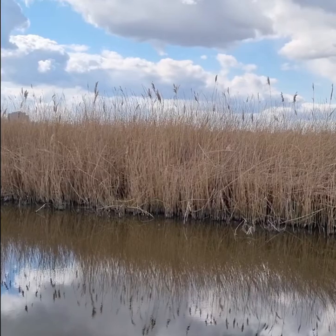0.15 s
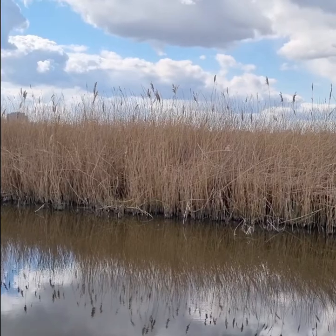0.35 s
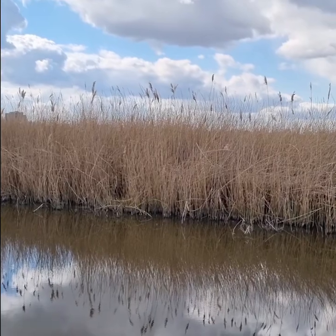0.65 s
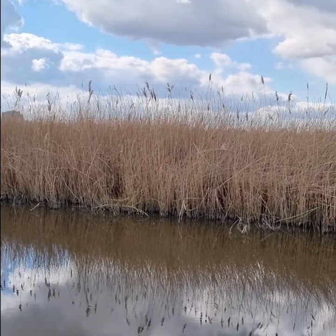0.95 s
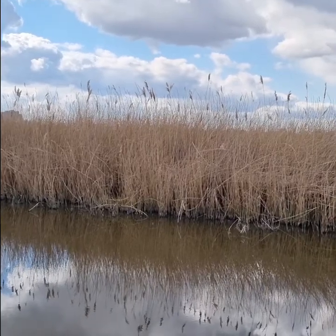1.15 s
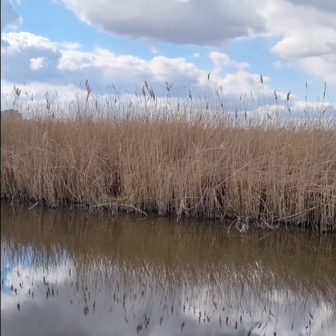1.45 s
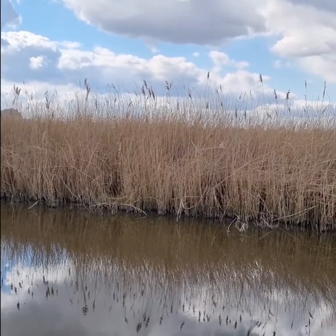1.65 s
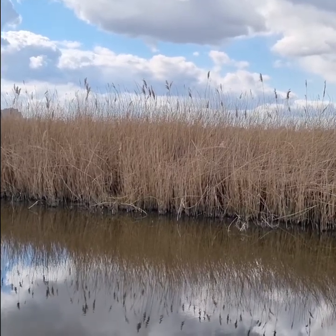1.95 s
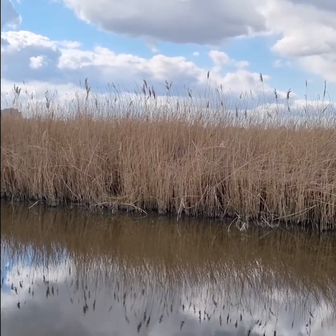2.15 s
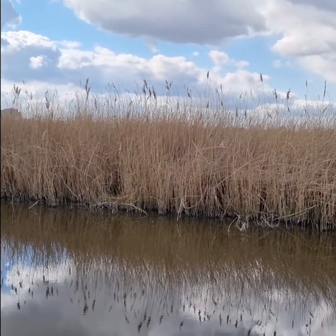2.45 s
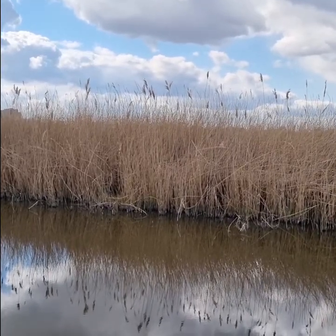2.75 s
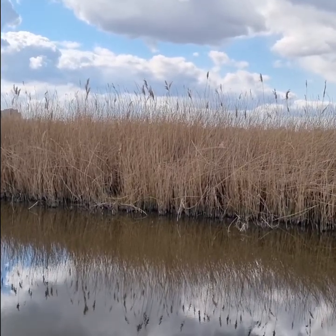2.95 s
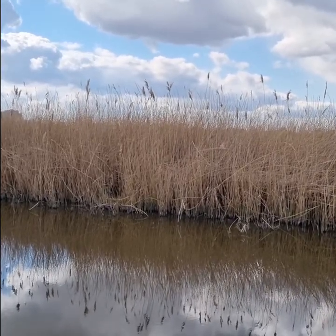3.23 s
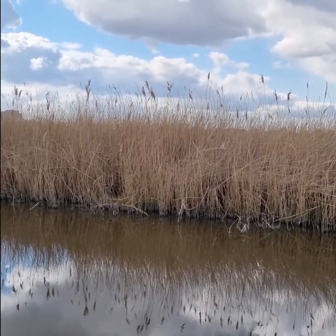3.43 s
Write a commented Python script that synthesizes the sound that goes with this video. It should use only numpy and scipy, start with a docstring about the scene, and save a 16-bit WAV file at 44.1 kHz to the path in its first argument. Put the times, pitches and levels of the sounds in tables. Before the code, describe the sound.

A songbird in a waterside reed bed, slightly to the right, repeats slurred notes before breaking into quick chips, ticking chatter and swelling rasps. Wind rumbles low throughout, with faint far traffic and thin whistles from other birds.

```python
"""A reed bed across a ditch, a little to the right, where a reed warbler sings: five sweeping notes with
upward slurs, four hoarse arches, pairs of falling chips, tick-and-zip chatter and two swelling rasps.
Vibrating membranes in its syrinx are the source, throat and beak the filter; the stems scatter the song.
Fainter birds whistle behind it, over low wind rumble, a far road on the left, a faint passing hum
and a brief rustle of dry reeds."""
import sys
import numpy as np
from scipy import signal
from scipy.fft import rfft, irfft
from scipy.io import wavfile
from scipy.ndimage import map_coordinates

SR = 44100
rng = np.random.default_rng(int(sys.argv[2]) if len(sys.argv) > 2 else 0)


def generate_wav(signal):
    """Clip the signal to [-1, 1] and save it as 16-bit WAV at the path in sys.argv[1]."""
    frames = np.transpose(np.atleast_2d(signal))
    scaled = np.clip(frames, -1, 1) * 32767
    pcm = np.round(scaled).astype(np.int16)
    wavfile.write(sys.argv[1], SR, pcm)


N = 158319
EDGE_S = 0.0013


def undb(db):
    return 10 ** (np.asarray(db) / 20)


def unit(x):
    return x / np.sqrt(np.mean(x ** 2))


def clock(length_s):
    return np.arange(int(length_s * SR)) / SR


def curve(at, table):
    """Linear interpolation of every column of a table along the first."""
    rows = np.array(table, float).T
    return [np.interp(at, rows[0], col) for col in rows[1:]]


def db_at(hz, spectrum):
    """Interpolation of a spectrum on a log-frequency axis."""
    f, db = np.array(spectrum, float).T
    return np.interp(np.log(np.maximum(hz, 1)), np.log(f), db)


def colour(x, spectrum, share=1):
    """Linear filtering: each frequency gains a share of the spectrum's decibels."""
    hz = np.fft.rfftfreq(len(x), 1 / SR)
    return irfft(rfft(x) * undb(share * db_at(hz, spectrum)), len(x))


def noise(spectrum, size):
    """Filtered Gaussian noise of unit power."""
    return unit(colour(rng.standard_normal(size), spectrum))


def walk(rate_hz, size):
    """Smooth random modulation with a spread near 1."""
    at = np.arange(size) * rate_hz / SR
    return map_coordinates(rng.standard_normal(512), [at], order=3, mode="mirror")


def add(out, start_s, note):
    """Superposition: a note joins the mix with ramped edges."""
    t = np.arange(len(note)) / SR
    note = note * np.clip(np.minimum(t, t[-1] - t) / EDGE_S, 0, 1)
    i = int(start_s * SR)
    out[i:i + len(note)] += note[:N - i]


# Wind spectrum: frequency_hz, density_db
WIND_SPECTRUM = [(15, -23), (30, -17.5), (42, -16.5), (52, 1.5), (65, -0.5), (80, -2.5), (105, -6.5),
                 (140, -16), (200, -17.5), (280, -26), (420, -32.5), (700, -44.5), (2000, -79)]
def wind():
    """Correlated noise: a low rumble, nearly the same on both sides, gently unsteady."""
    mid, side = noise(WIND_SPECTRUM, N), noise(WIND_SPECTRUM, N)
    swell = undb(-45.5 + walk(3.8, N))
    return swell * (mid + undb(-15) * side * np.array([[1], [-1]]))


# Tyre spectrum: frequency_hz, density_db
TYRE_SPECTRUM = [(100, -16.5), (300, -12), (500, -15), (640, -9), (790, 1), (950, 1.5), (1180, -1),
                 (1550, -13), (2300, -24), (3600, -29.5), (4700, -36), (6000, -43), (7500, -56),
                 (10000, -60), (14000, -50.5)]
# Leftward bias, of which each ear takes a share: frequency_hz, bias_db
ROAD_BIAS = [(200, 6.5), (500, 12), (1300, 6.5), (2400, 6), (3500, -1)]
def road():
    """Interaural level difference places a steady tyre roar far off to the left."""
    shared = noise(TYRE_SPECTRUM, N)
    swell = undb(-51 + 1.1 * walk(3.576, N))
    left, right = [unit(np.roll(shared, lag) + undb(-1) * noise(TYRE_SPECTRUM, N)) for lag in (0, 2)]
    return swell * np.array([colour(left, ROAD_BIAS, 0.51), colour(right, ROAD_BIAS, -0.39)])


def syrinx(hz, partials, rough):
    """A vibrating membrane gives partials (multiple, level_db); roughness modulates size and phase."""
    size, rough_hz, jitter = len(hz), 697, 0.0066
    phase = 2 * np.pi * np.cumsum(hz * (1 + jitter * walk(300, size))) / SR
    shake = 1 + rough * (walk(2 * rough_hz, size) + 1j * walk(2 * rough_hz, size))
    tone = sum(undb(db) * np.exp(1j * k * phase) for k, db in partials)
    return np.sqrt(2 / (1 + 2 * rough ** 2)) * np.imag(shake * tone)


# Glide of a sweep's fundamental: time_s, pitch_hz
SWEEP_GLIDE = [(0, 1420), (.011, 1650), (.02, 1780), (.028, 1823), (.04, 1707), (.06, 1670), (.082, 1540),
               (.105, 1460), (.135, 1440)]
# Envelopes of its harmonics: time_s, second_db, third_db, fourth_db
SWEEP_ENVELOPES = [(0, -27, -27, -28), (.011, -4, -3, -17.5), (.026, 0.5, -11.5, -37.5),
                   (.04, -7, -11, -40.5), (.06, -8.5, -18.5, -53.5), (.08, -26.5, -13, -59.5),
                   (.1, -25, -32, -58), (.145, -30, -48, -67)]
# Noise of its attack: frequency_hz, density_db
ATTACK_SPECTRUM = [(2800, -22.5), (4200, -13), (4800, 2.5), (6600, -6.5), (7400, -20.5), (9000, -52)]
# Sweeping notes: start_s, pitch_ratio, level_db, brightness_db
SWEEP_NOTES = [(0.146, 0.96, -51, 1.5), (.372, 1.005, -48.5, -2.5), (0.609, 1, -49, 0.5),
               (0.861, 1, -46.5, -1), (1.121, 1.004, -46.5, -2)]
def sweeps():
    """Frequency modulation: harmonics 2 to 4 leap up with a rough attack and sink slowly."""
    out, t = np.zeros(N), clock(SWEEP_ENVELOPES[-1][0])
    hz, = curve(t, SWEEP_GLIDE)
    second, third, fourth = curve(t, SWEEP_ENVELOPES)
    rough = 0.065 + 0.4 * np.exp(-t / 0.0077)
    peak_s = 0.016
    burst = undb(-16.5) * t / peak_s * np.exp(1 - t / peak_s)
    for start, ratio, db, brightness_db in SWEEP_NOTES:
        flutter_db = 2.2 * walk(150, len(t))
        low = syrinx(ratio * hz, [(2, second + flutter_db)], rough)
        upper = syrinx(ratio * hz, [(3, third - flutter_db), (4, fourth)], .5 * np.exp(-t / 0.053))
        attack = burst * noise(ATTACK_SPECTRUM, len(t))
        add(out, start, undb(db) * (low + undb(brightness_db) * (upper + attack)))
    return out


def reed_bed(song):
    """Multiple scattering: near stems add quick echoes to the direct sound, the whole bed a tail."""
    t, ears = clock(.5), []
    near_decay_s, tail_t60_s = 0.016, 0.25
    for side, lag_s in ((0.35, 0), (-1.14, .00005)):  # left ear, then the louder right
        near, far = rng.standard_normal((2, len(t)))
        near = undb(-7.5) * unit(near * np.exp(-t / near_decay_s))
        far = undb(-10.5) * unit(far * undb(-60 * t / tail_t60_s))
        scattered = signal.fftconvolve(song, (near + far) / np.sqrt(len(t)))[:N]
        direct = np.roll(song, round(lag_s * SR))
        ears.append(undb(-7.5 * side / 2) * direct + undb(-8.5 * side / 2) * scattered)
    return np.array(ears)


# Contour of a slur: length_fraction, nominal_pitch_hz, level_db
SLUR_CONTOUR = [(0, 2996, -17.5), (.3, 3214, -3.5), (.52, 3545, -1.5), (.75, 3905, -4), (1, 3630, -7)]
# Slurs between the sweeps: start_s, length_s, pitch_ratio, level_db, roughness
SLUR_NOTES = [(0.287, 0.041, 1, -58.5, 0.33), (0.507, 0.051, 1, -54.5, .3), (0.761, .045, 1, -54, .36),
              (1.02, 0.042, 0.99, -54.5, 0.31)]
def slurs():
    """Glissando: one hoarse partial leads back up to the next sweep."""
    out = np.zeros(N)
    for start, length, ratio, db, rough in SLUR_NOTES:
        hz, shape_db = curve(clock(length) / length, SLUR_CONTOUR)
        add(out, start, syrinx(ratio * hz, [(0.98, db + shape_db)], rough))
    return out


# Band of the hum: pitch_ratio, density_db
HUM_SPECTRUM = [(.65, -42), (.92, -9), (1.001, 0.5), (1.06, -3), (1.169, -24.5), (1.7, -58.5)]
def far_hum(start_s=1.1, length_s=0.45, pitch_hz=402, level_db=-68.5):
    """Narrow-band noise is heard as a pitch: a faint hum swells and fades in the distance."""
    out, progress = np.zeros(N), clock(length_s) / length_s
    hum = noise([(ratio * pitch_hz, db) for ratio, db in HUM_SPECTRUM], len(progress))
    add(out, start_s, undb(level_db) * np.sqrt(2 * np.sin(np.pi * progress)) * hum)
    return out


# Contour of an arch: length_fraction, pitch_hz, level_db
ARCH_CONTOUR = [(0, 1200, -9), (.3, 1428, -7), (.5, 1500, -2), (.75, 1480, -5), (1, 1296, -9)]
# Arched notes: start_s, length_s, pitch_ratio, level_db, third_db, fourth_db, roughness
ARCH_NOTES = [(1.319, 0.039, .985, -56, 0.5, 4.5, .3), (1.37, 0.048, 1.03, -51, -9.5, -36, 0.53),
              (1.428, .044, 1.08, -48.5, -24, -40, 0.53), (1.493, 0.028, 1.13, -48.5, -26.5, -35, 0.03)]
def arches():
    """Brightness grows with amplitude: hoarse notes rise and bend, the first flashing at its top."""
    out = np.zeros(N)
    for start, length, ratio, db, third_db, fourth_db, rough in ARCH_NOTES:
        hz, shape_db = curve(clock(length) / length, ARCH_CONTOUR)
        partials = [(2, 0), (3, third_db), (4, fourth_db + 1.4 * (shape_db + 1.5))]
        add(out, start, undb(db + shape_db) * syrinx(ratio * hz, partials, rough))
    return out


# Envelope of the rustle: time_s, level_db
RUSTLE_ENVELOPE = [(1.58, -105), (1.67, -82), (1.72, -82), (1.82, -87), (1.86, -77.5), (1.95, -105)]
# Spectrum of rubbing reeds: frequency_hz, density_db
RUSTLE_SPECTRUM = [(2000, -6.5), (5000, 0), (7000, 9), (9000, -12.5), (13000, -1.5), (15500, -5)]
def rustle():
    """Friction noise: dry reeds brush each other for a moment."""
    db, = curve(np.arange(N) / SR, RUSTLE_ENVELOPE)
    return np.array([undb(db + 2.7 * walk(110, N)) * noise(RUSTLE_SPECTRUM, N) for _ in range(2)])


def beak(hz, cutoff_hz):
    """Low-pass filtering: the beak's gain in dB falls steeply above its passband."""
    return -10 * np.log10(1 + (hz / cutoff_hz) ** 20)


# Throat resonances: frequency_hz, gain_db
FORMANTS = [(1800, -24), (2500, -9.5), (3050, -9.5), (3600, 2.5), (4150, -11), (4650, 1.5), (5050, -6.5),
            (5500, -3), (6100, -13.5), (6550, -5.5), (7300, -30), (9000, -56.5)]
def throat(hz, harmonics_db, rough, cutoff_hz=6800):
    """Source and filter: a harmonic series glides through the response of throat and beak."""
    partials = [(k, db + db_at(k * hz, FORMANTS) + beak(k * hz, cutoff_hz))
                for k, db in enumerate(harmonics_db, 1)]
    return syrinx(hz, partials, rough)


# Paired chips: start_s, starting_pitch_hz, level_db, roughness, beak_cutoff_hz
CHIP_NOTES = [(1.581, 2800, -50.5, 0.3, 4430), (1.618, 2615, -48.5, 0.37, 4930),
              (1.704, 2940, -50, 0.25, 6000), (1.747, 2472, -51.5, 0.42, 5800),
              (1.839, 2930, -52, .15, 6150), (1.878, 2540, -49.5, .16, 5900), (1.971, 3010, -52, .2, 6600),
              (2.011, 2554, -47, .12, 6400), (2.105, 2940, -52, 0.25, 6500),
              (2.145, 2495, -50.5, 0.3, 6050)]
def chips(length_s=0.026, floor_hz=1487, fall_s=.009, harmonics_db=(2, -4, -5, -15.5)):
    """Exponential relaxation: the pitch plunges and levels off as the note swells, scratches and fades."""
    out, t = np.zeros(N), clock(length_s)
    shape_db, = curve(t / length_s, [(0, -5.5), (.45, -0.5), (1, -11)])
    for start, from_hz, db, rough, cutoff_hz in CHIP_NOTES:
        hz = floor_hz + (from_hz - floor_hz) * np.exp(-t / fall_s)
        passband = [(f, gain_db + beak(f, cutoff_hz)) for f, gain_db in FORMANTS]
        scratch = noise(passband, len(t)) * undb(shape_db - 14) * (1 + 2 * rough)
        add(out, start, undb(db + shape_db) * (throat(hz, harmonics_db, rough, cutoff_hz) + scratch))
    return out


# Whistles of farther birds: start_s, length_s, from_hz, to_hz, level_db
FAR_WHISTLES = [(1.73, 0.031, 4020, 3900, -59), (1.747, .024, 4000, 3224, -55),
                (1.912, .034, 3800, 3320, -64.5), (2.095, 0.041, 3900, 3640, -65),
                (2.238, 0.066, 3960, 3540, -69), (2.336, 0.028, 3230, 3290, -64),
                (2.367, 0.016, 3330, 3310, -56.5), (3.27, 0.033, 6900, 6600, -92),
                (3.303, 0.096, 5850, 5080, -77.5), (3.385, .033, 5680, 5270, -75)]
def other_birds():
    """Linear chirps of a single partial: thin whistles from deeper in the reeds."""
    out = np.zeros(N)
    for start, length, from_hz, to_hz, db in FAR_WHISTLES:
        progress = clock(length) / length
        whistle = syrinx(from_hz + (to_hz - from_hz) * progress, [(1, db)], rough=0.098)
        add(out, start, np.sqrt(np.sin(np.pi * progress)) * whistle)
    return out


# Tick before each zip: start_s, level_db
TICK_NOTES = [(2.263, -54.5), (2.427, -51.5), (2.628, -53), (2.81, -53.5)]
def ticks(length_s=.015, from_hz=1150, to_hz=2830, harmonics_db=(-21.5, -2.5, -10.5, -12)):
    """An exponential upward chirp, so brief that it is heard as a tick."""
    out = np.zeros(N)
    hz = np.geomspace(from_hz, to_hz, int(length_s * SR))
    for start, db in TICK_NOTES:
        add(out, start, undb(db) * throat(hz, harmonics_db, rough=.35))
    return out


# Hiss in zips and rasps: frequency_hz, density_db
HISS_SPECTRUM = [(2000, -13.5), (3100, -12), (3650, 3), (4100, -2), (4550, 5), (5150, 1.5), (5600, -25.5),
                 (6000, -35.5), (6500, -17), (7200, -48.5)]
# Contour of a zip: length_fraction, pitch_hz, level_db
ZIP_CONTOUR = [(0, 621, -9.5), (.25, 830, -2.5), (.45, 1040, -3), (.64, 1156, 2.5), (.73, 1248, -1),
               (.82, 1560, 1.5), (.92, 1794, 3), (1, 1930, -4)]
# Zips: start_s, length_s, level_db
ZIP_NOTES = [(2.297, 0.079, -58), (2.456, 0.084, -56.5), (2.661, .087, -57.5), (2.844, 0.088, -58)]
def zips(harmonics_db=(-21.5, 0, -6, 0, -12.5, -5, -27)):
    """Formant filtering: a low buzz triples in pitch, its harmonics crossing the throat's resonances."""
    out = np.zeros(N)
    for start, length, db in ZIP_NOTES:
        hz, shape_db = curve(clock(length) / length, ZIP_CONTOUR)
        buzz = throat(hz, harmonics_db, rough=.22, cutoff_hz=5450)
        flutter_db = 2.5 * walk(303, len(hz))
        hiss = undb(-7.5) * noise(HISS_SPECTRUM, len(hz))
        add(out, start, undb(db + shape_db + flutter_db) * (buzz + hiss))
    return out


# Two-voiced rasps: start_s, length_s, nominal_low_hz, nominal_high_hz, level_db
RASP_NOTES = [(3.093, .145, 2570, 4644, -55), (3.345, .146, 2500, 4320, -53)]
def rasps(pulse_hz=61.6, swell_db=16, pitch_rise=.085):
    """Biphonation: both sides of the syrinx pulse together on two pitches and swell to a sudden stop."""
    out = np.zeros(N)
    for start, length, low_hz, high_hz, db in RASP_NOTES:
        t = clock(length)
        slack = np.clip(1 - t / (.72 * length), 0, 1)  # falls to 0 as the note reaches full strength
        pulse = np.sin(np.pi * pulse_hz * t) ** 2
        bend = 1 - pitch_rise * slack + 0.0083 * (pulse - 1)
        vibrato = .025 * np.sin(2 * np.pi * pulse_hz * t)
        low = syrinx(low_hz * (bend + vibrato), [(0.99, -6.5)], rough=0.29) * pulse
        high = syrinx(high_hz * bend, [(0.97, 0.0085)], rough=.8) * (0.15 + 0.5 * pulse)
        hiss = undb(-2) * noise(HISS_SPECTRUM, len(t)) * (.28 + 0.33 * pulse)
        hiss *= undb(2.7 * walk(499, len(t)) - 4.3 * slack)
        add(out, start, undb(db - swell_db * slack) * (low + high + hiss))
    return out


def scene():
    """Superposition: birdsong scattered by the reeds adds to the background sounds."""
    song = sweeps() + slurs() + arches() + chips() + ticks() + zips() + rasps() + other_birds()
    return undb(-1.36) * reed_bed(song) + wind() + road() + rustle() + far_hum()


def record(dry, silence_s=.147, cutoff_hz=15700):
    """Gating and band limiting: the sound opens after a moment of silence, its top treble cut."""
    gate = np.clip((np.arange(N) / SR - silence_s) / EDGE_S, 0, 1)
    lowpass = signal.ellip(8, .2, 70, cutoff_hz, fs=SR, output="sos")
    return signal.sosfilt(lowpass, dry * gate)


dry = scene()
out = record(dry)
generate_wav(out)
```